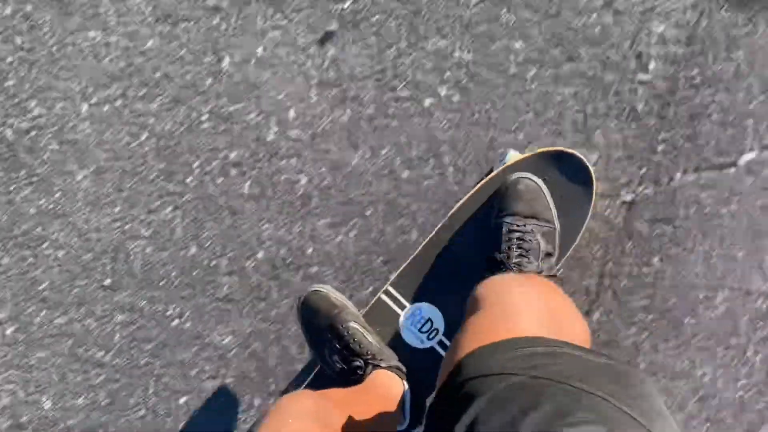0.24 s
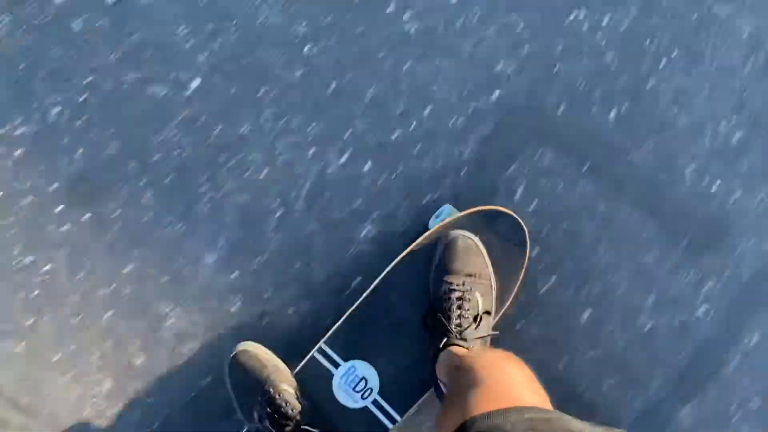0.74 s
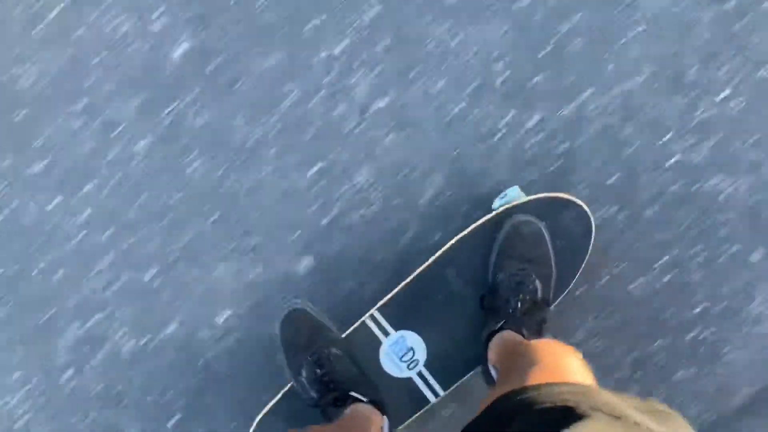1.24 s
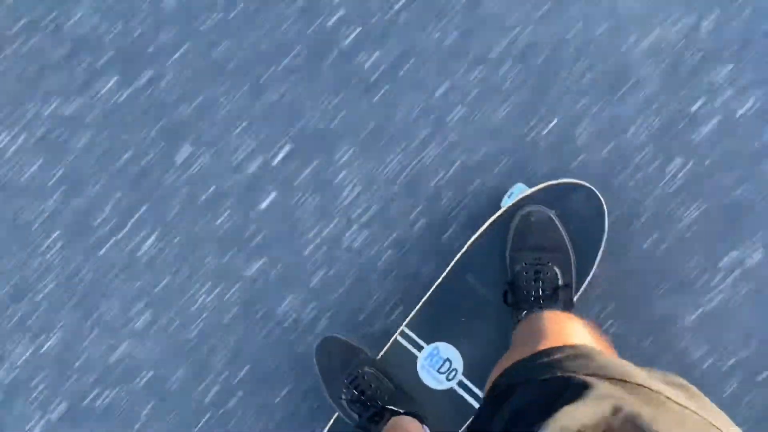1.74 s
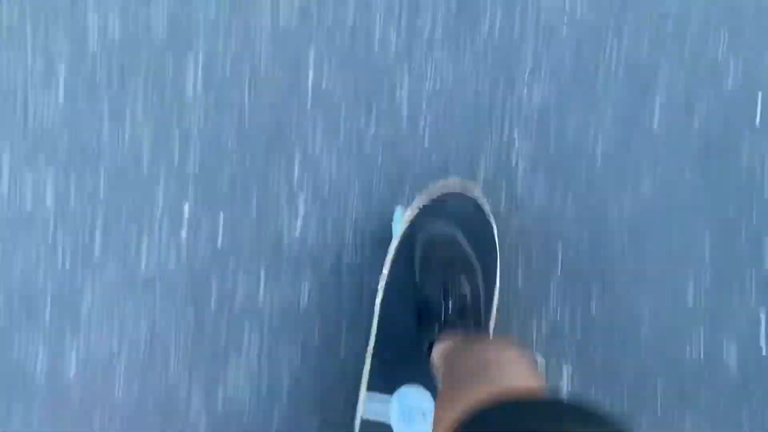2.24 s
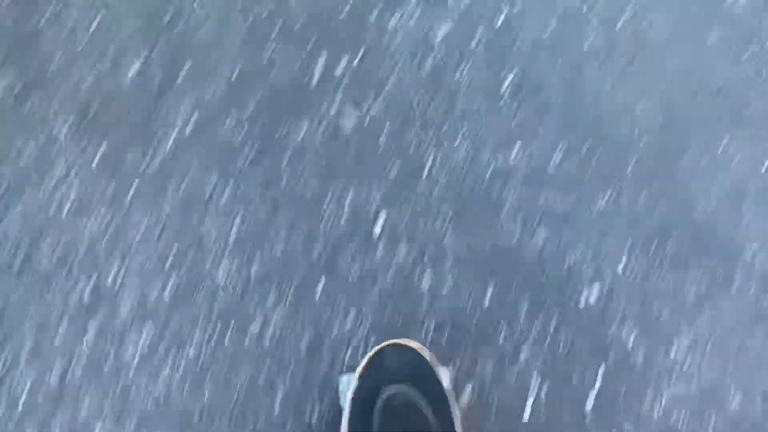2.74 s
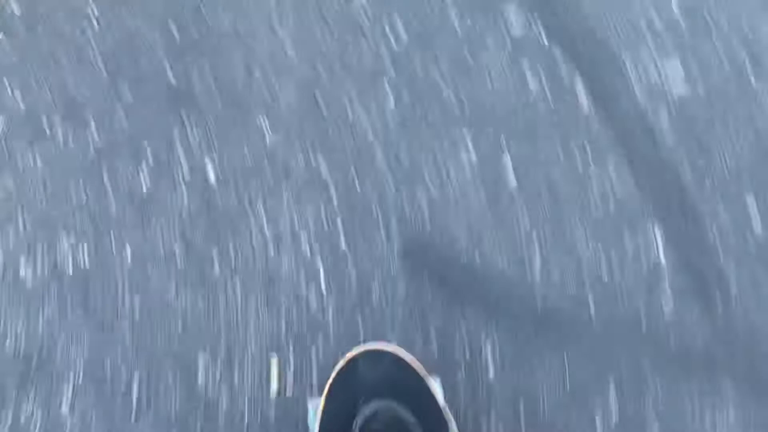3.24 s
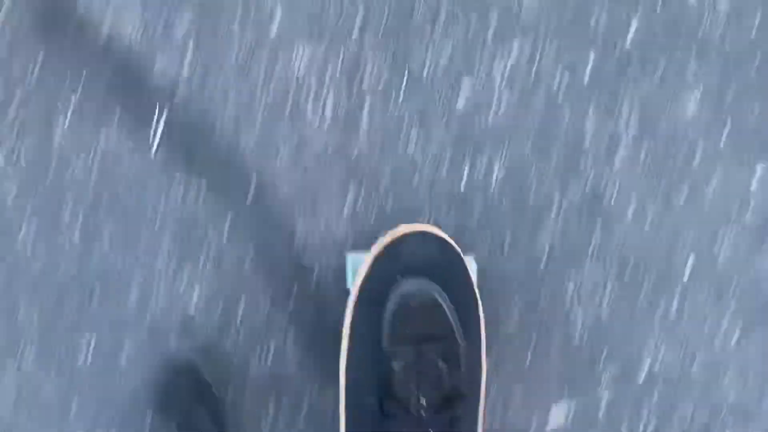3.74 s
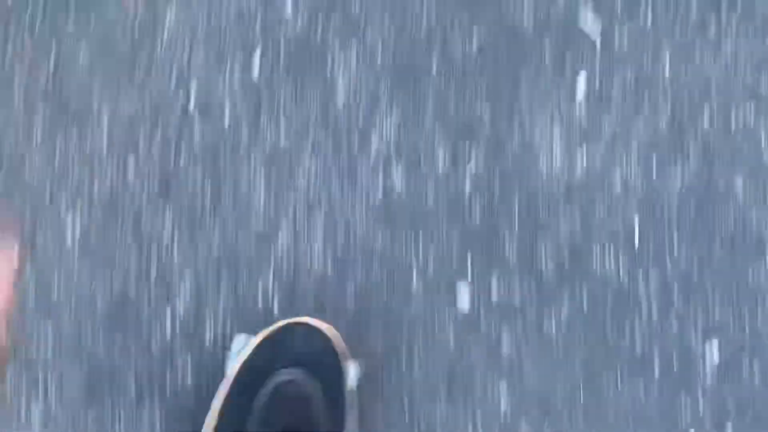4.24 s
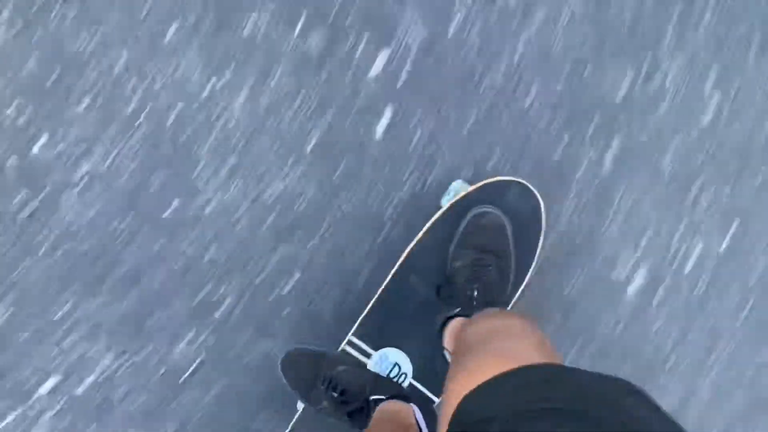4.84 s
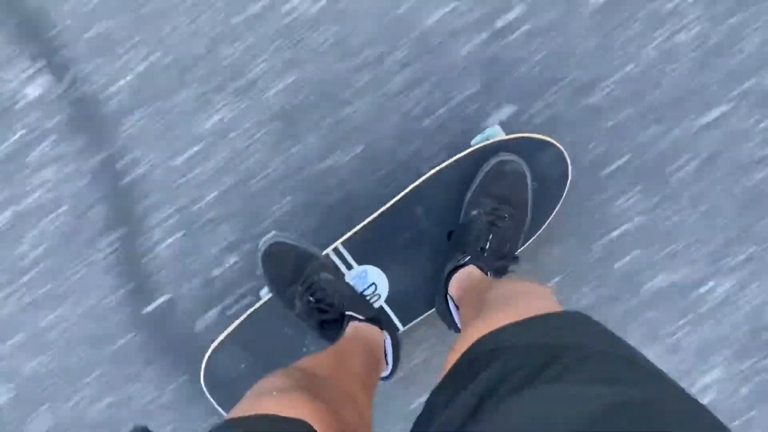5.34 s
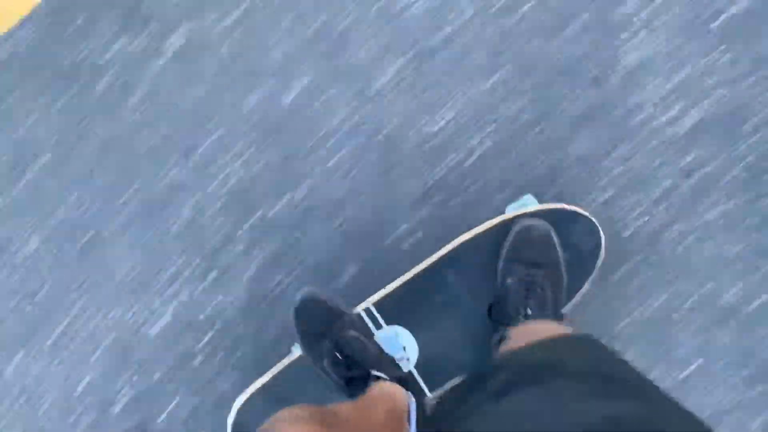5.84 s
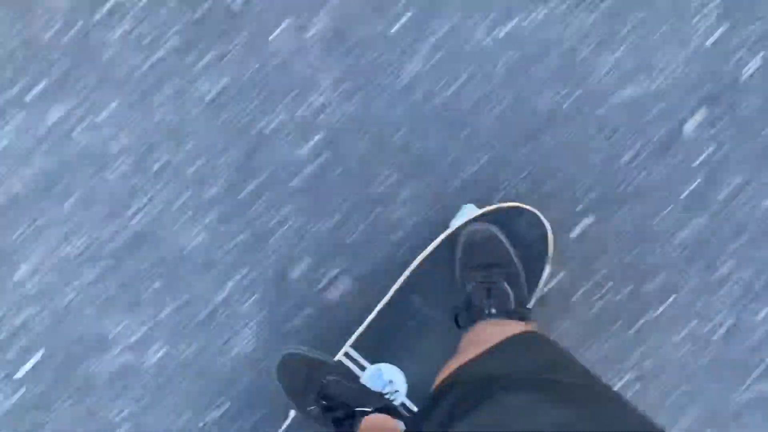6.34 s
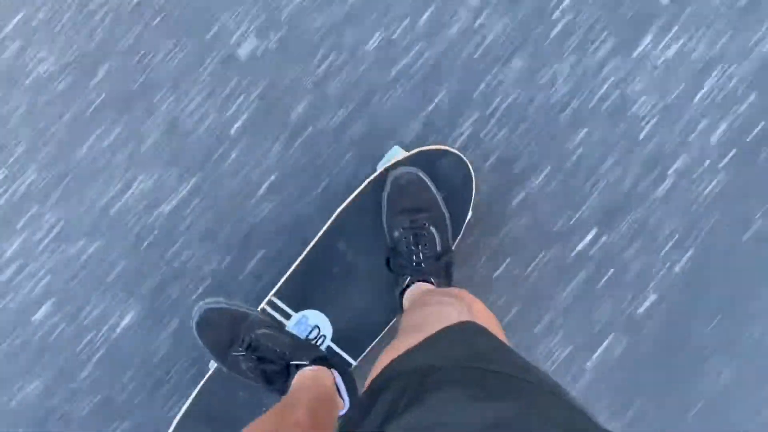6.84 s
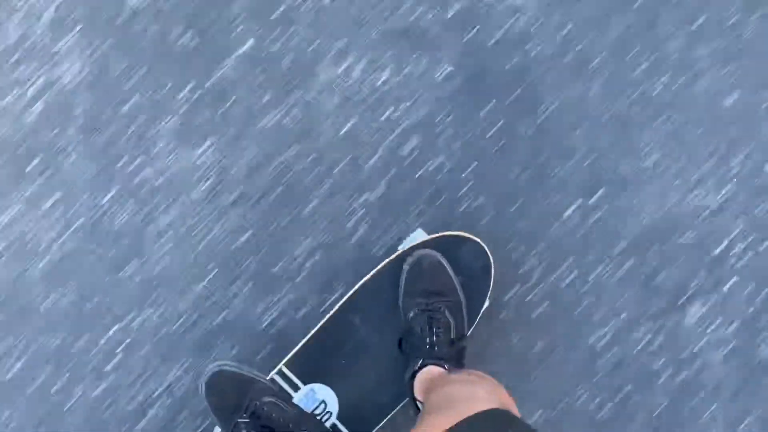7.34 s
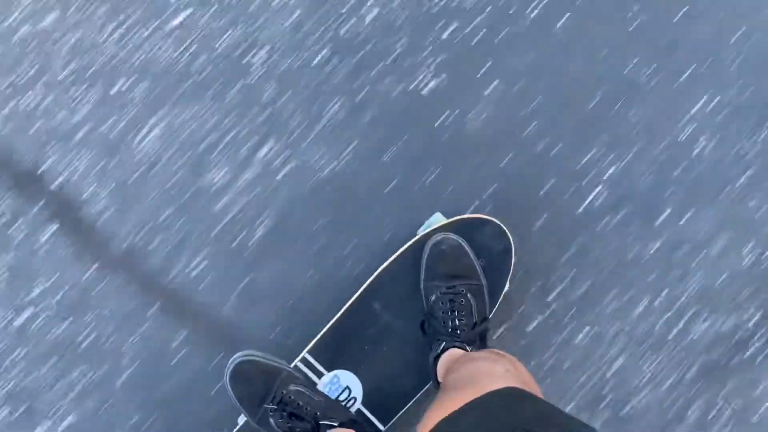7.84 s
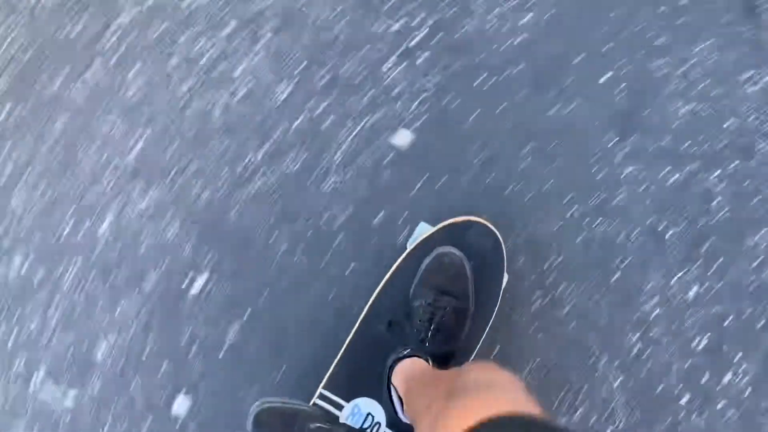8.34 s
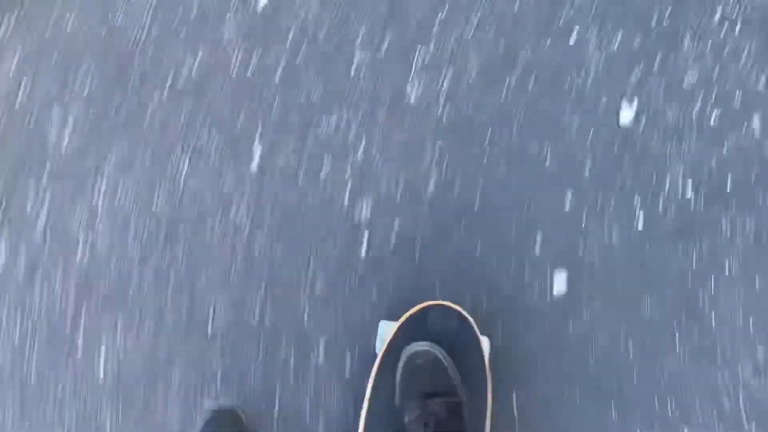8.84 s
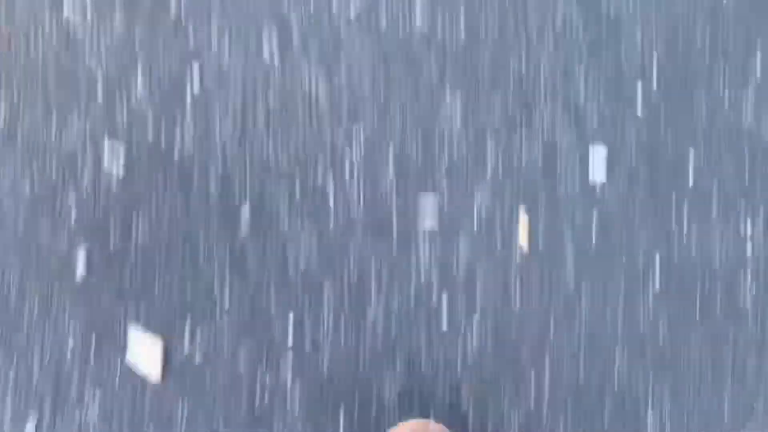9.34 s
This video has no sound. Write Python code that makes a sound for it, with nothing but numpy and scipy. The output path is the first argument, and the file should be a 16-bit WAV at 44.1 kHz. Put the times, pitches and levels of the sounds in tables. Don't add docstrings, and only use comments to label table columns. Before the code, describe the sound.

Close-up of soft skateboard wheels on coarse street pavement: grainy rattling roar, woody thumps over cracks, small metallic ticks, faint distant engine drone beneath.

```python
import sys
import numpy as np
from scipy import signal
from scipy.fft import rfft, irfft, next_fast_len
from scipy.io import wavfile
from scipy.ndimage import map_coordinates

SR = 44100
rng = np.random.default_rng(int(sys.argv[2]) if len(sys.argv) > 2 else 0)


def voltage_ratio(decibels):
    exponent = np.asarray(decibels, float) / 20
    return 10 ** exponent


def log_audio(samples):
    frames = np.atleast_2d(samples).T
    limited = np.clip(frames, -1, 1)
    pcm = np.round(limited * 32767).astype(np.int16)
    wavfile.write(sys.argv[1], SR, pcm)


N = 422478

# frequency in Hz, density in dB per Hz.
FIZZ = [(3500, -40), (5000, 4.5), (7000, -0.5), (10200, 1), (10900, -7.5), (15500, -7.5)]


def unit(x):
    return x / np.sqrt(np.mean(x ** 2) + 1e-20)


def along(points, hz):
    f, value = np.transpose(points)
    return np.interp(np.log(hz + 1), np.log(f + 1), value)


def curves(rows):
    seconds, *columns = np.transpose(rows)
    t = np.arange(N) / SR
    return [np.interp(t, seconds, column) for column in columns]


def wobble(rate):
    knots = rng.standard_normal(int(N * 100 / SR) + 4)
    return map_coordinates(knots, [np.arange(N) * min(rate, 99) / SR])


def filtered(x, response):
    size = next_fast_len(N + SR // 2)
    hz = np.fft.rfftfreq(size, 1 / SR)
    return irfft(rfft(x, size) * response(hz), size)[..., :N]


def coloured(x, spectrum):
    return unit(filtered(x, lambda hz: voltage_ratio(along(spectrum, hz))))


def modes(table):
    return lambda f: sum(voltage_ratio(db) * 1j * f * width / (centre * centre - f * f + 1j * f * width)
                         for centre, width, db in table)


def stones(count, spread_db, t60, smooth_db, clump_db):
    when, size = rng.random((2, count))
    strength = voltage_ratio(-spread_db * np.log(size + 1e-4))
    strikes = np.bincount((when * N).astype(int), strength, N)
    t = np.arange(1500) / SR
    flares = unit(signal.fftconvolve(strikes, voltage_ratio(-60 * t / t60))[:N])
    envelope = flares * voltage_ratio(clump_db * wobble(25)) + voltage_ratio(smooth_db)
    return envelope * rng.standard_normal(N)


def rolling():
    # time in seconds, deck ring in dB, deck body in dB over the ring, grit in dB, fizz in dB.
    roll = [(0.0, -34, 6.5, -42.5, -65.5), (0.1, -20.5, -8, -37, -57), (0.29, -21.5, -8.5, -30, -46),
            (0.61, -29, 4.5, -40, -57), (0.77, -28.5, -1, -45, -56), (0.98, -31, 6.5, -43.5, -53),
            (1.41, -28.5, 0, -42, -52.5), (1.62, -22.5, -8.5, -33, -46.5), (1.79, -25, -6, -35, -50.5),
            (1.97, -25, -2, -38, -55.5), (2.11, -26, -6.5, -44, -62.5), (2.24, -26.5, -12, -40, -58),
            (2.37, -31.5, -5, -47.5, -66), (2.48, -26.5, -9, -43, -60.5), (2.85, -35, -5, -48, -57.5),
            (2.91, -30.5, 0, -39, -52), (3.04, -23, -19, -32.5, -47), (3.09, -24.5, 2.5, -34.5, -50.5),
            (3.23, -32.5, -10, -42, -54), (3.28, -29.5, 1.5, -42.5, -51), (3.41, -33, -9.5, -43.5, -58.5),
            (3.49, -29.5, 3.5, -42, -51), (3.68, -24, 1.5, -38, -54), (3.84, -22, -7, -29.5, -48),
            (4.0, -28, 11.5, -38.5, -55), (4.24, -28.5, 4.5, -43.5, -55.5), (4.59, -19.5, 0.5, -31, -50),
            (4.67, -21.5, -6, -37, -49), (4.8, -21.5, -4.5, -37, -50), (5.07, -22, -2, -40.5, -53.5),
            (5.2, -22.5, 0, -41.5, -56.5), (5.58, -25.5, -0.5, -39.5, -51.5), (5.76, -24, 1.5, -44.5, -55),
            (6.0, -24, -3.5, -46, -57), (6.3, -28.5, 5.5, -42, -58), (6.69, -26.5, -5.5, -47.5, -61.5),
            (6.88, -27, 1.5, -42, -55.5), (6.99, -27, -7.5, -42.5, -58), (7.04, -20.5, -0.5, -35, -51),
            (7.07, -28.5, -1.5, -44, -57.5), (7.52, -28, -3, -42, -55), (7.63, -27.5, 3, -38.5, -52),
            (7.74, -28.5, -2.5, -41.5, -54), (7.82, -28.5, 3.5, -40, -54), (7.92, -30, -4, -41.5, -53),
            (8.06, -25.5, -3.5, -47.5, -56), (8.22, -28.5, -9.5, -46.5, -59), (8.48, -32, 1, -50, -58),
            (8.62, -41, 7, -52, -53), (8.81, -29, 2, -44, -51), (8.94, -25, -0.5, -39, -54),
            (9.28, -41, 9, -51, -56.5), (9.53, -35, 8.5, -42.5, -48.5), (9.58, -25, -4, -42, -51)]
    # centre in Hz, width in Hz, level in dB.
    deck = [(590, 93, 3), (499, 96, -6.5), (659, 35, -11)]
    trucks = [(1065, 134, 5.6), (2090, 86, 5.4), (2600, 610, 1.1), (6860, 320, 2.3)]
    # frequency in Hz, density in dB per Hz.
    body_spectrum = [(90, -25), (150, -2), (240, 2.5), (400, -1.5), (520, -11), (760, -13), (1000, -72)]
    grit_spectrum = [(600, -49), (850, 0), (1250, -2), (1900, -5.5), (2600, -6.5), (3300, -11.5),
                     (4200, -12.5), (5500, -39.5)]
    ring_db, body_db, grit_db, fizz_db = curves(roll)

    jolts = stones(count=2500, spread_db=1.5, t60=0.013, smooth_db=6.5, clump_db=3.0)
    deck_ring = filtered(jolts, lambda f: modes(deck)(f) / (1 + (f / 740) ** 12))
    ring = voltage_ratio(ring_db + 1.0) * unit(deck_ring)
    body = voltage_ratio(ring_db + body_db + 1.66 * wobble(20)) * coloured(jolts, body_spectrum)

    crackle = stones(count=1500, spread_db=3.0, t60=0.012, smooth_db=1.5, clump_db=5.5)
    crackle = filtered(crackle, lambda f: 1 + 0.76 * modes(trucks)(f))
    grit = voltage_ratio(grit_db + 4 + 1.63 * wobble(30)) * coloured(crackle, grit_spectrum)
    fizz = voltage_ratio(fizz_db + 5 + 1.7 * wobble(30)) * coloured(crackle, FIZZ)
    return ring + body + grit + fizz


def air():
    # time in seconds, level in dB.
    gusts = [(0.0, -33.5), (0.26, -29.5), (0.37, -38), (0.51, -30.5), (0.77, -38), (0.85, -28), (0.93, -35),
             (1.12, -33.5), (1.71, -31.5), (1.76, -28.5), (2.0, -35), (2.08, -30), (2.19, -33), (2.59, -30),
             (2.77, -35), (2.83, -27), (2.88, -31), (2.96, -21), (3.04, -34), (3.33, -32), (3.49, -17),
             (3.6, -25), (3.87, -31.5), (4.03, -23.5), (4.08, -36), (4.24, -19), (4.38, -21), (4.43, -32.5),
             (5.55, -31.5), (6.16, -20.5), (6.24, -28), (6.3, -21), (6.51, -34), (6.56, -32), (6.99, -33),
             (7.02, -31.5), (7.63, -30.5), (7.79, -33.5), (9.26, -35.5), (9.34, -26), (9.45, -27.5),
             (9.58, -32)]
    # frequency in Hz, density in dB per Hz.
    buffet = [(12, -47), (20, -34), (48, -2), (92, 4.5), (168, -3.5), (200, -4.5), (260, -31), (440, -120)]
    lumps = voltage_ratio(1.35 * wobble(12)) * rng.standard_normal(N)
    return voltage_ratio(curves(gusts)[0] - 1.0) * coloured(lumps, buffet)


def knocks():
    # start in seconds, peak in dB, deck pitch in Hz, 60 dB decay time in seconds.
    impacts = [(0.025, -10, 572, 0.054), (0.144, -12.5, 596, 0.05), (0.18, -9.5, 556, 0.05),
               (0.244, -5.5, 532, 0.055), (0.433, -8, 571, 0.06), (0.546, -26, 550, 0.05),
               (1.535, -10, 617, 0.05), (1.684, -12, 584, 0.05), (1.954, -10.5, 546, 0.05),
               (1.978, -10.5, 498, 0.056), (2.176, -9.5, 590, 0.05), (2.271, -13, 603, 0.056),
               (2.951, -13.5, 589, 0.046), (3.6, -2, 605, 0.057), (3.657, -15, 604, 0.05),
               (3.709, -21.5, 589, 0.05), (4.203, -8.5, 570, 0.035), (4.299, -14, 580, 0.05),
               (4.507, -2, 575, 0.053), (4.553, -5, 629, 0.044), (4.598, -3, 573, 0.056),
               (4.711, -1.5, 604, 0.046), (4.762, -6.5, 595, 0.05), (4.783, -19.5, 600, 0.056),
               (4.868, -7.5, 600, 0.05), (5.076, -6.5, 592, 0.057), (5.113, -12.5, 589, 0.05),
               (5.239, -16, 587, 0.046), (5.35, -8.5, 599, 0.05), (5.391, -5.5, 578, 0.056),
               (5.421, -10, 575, 0.042), (5.439, -6, 548, 0.05), (5.792, -6.5, 573, 0.053),
               (5.812, -11, 535, 0.047), (6.195, -8, 532, 0.045), (6.335, -8.5, 625, 0.042),
               (6.358, -5, 580, 0.043), (6.867, -2.5, 571, 0.044), (7.031, -4, 454, 0.039),
               (7.809, -9, 528, 0.05)]
    out = np.zeros(N + SR)
    t = np.arange(SR // 8) / SR
    for (start, peak_db, hz, t60), turn in zip(impacts, rng.random(len(impacts))):
        loading = (1 - np.exp(-t / 0.0022)) ** 2
        swell = loading * voltage_ratio(-60 * t / max(t60, 0.01))
        tone = np.sin(2 * np.pi * (hz * t + turn))
        out[round(start * SR):][:len(t)] += voltage_ratio(peak_db - 2.5) * swell / swell.max() * tone
    return out[:N]


def clicks():
    # start in seconds, peak in dB, centre in Hz, treble in dB over the peak.
    snaps = [(0.0618, -17.5, 2050, -30), (0.0927, -20, 1960, -20), (0.109, -15, 2000, -21),
             (0.1403, -19, 2010, -28), (0.159, -19, 1990, -19), (0.1935, -26, 1880, -18),
             (0.2239, -27, 1920, -19), (0.2394, -21, 1940, -13), (0.3057, -19, 1950, -15),
             (0.375, -37, 1500, -11), (0.375, -19.5, 1680, -21), (0.474, -19.5, 2600, -27),
             (0.541, -24, 2100, -19), (0.5896, -29, 2780, -29), (0.674, -23.5, 2360, -14),
             (1.008, -26, 2660, -11), (1.047, -27, 2170, -9), (1.065, -23.5, 2750, -14),
             (1.122, -28, 2740, -8), (1.4711, -41, 1670, -15), (1.5808, -24, 1500, -23),
             (1.6013, -27, 2800, -12), (1.625, -22, 1610, -16), (1.7268, -18, 2230, -23),
             (1.8083, -20, 2280, -21), (1.8791, -22, 2270, -21), (1.9195, -32, 1500, -17),
             (1.9204, -18, 2150, -13), (1.9786, -16.5, 2280, -21), (2.1415, -25.5, 2410, -26),
             (2.174, -20, 2130, -23), (2.273, -20.5, 2050, -27), (2.9183, -24, 1490, -23),
             (2.9187, -21, 1520, -16), (2.929, -17, 1770, -16), (2.9708, -21, 1710, -16),
             (2.9723, -16, 1700, -15), (3.0147, -17.5, 1730, -16), (3.0719, -18, 1750, -22),
             (3.189, -22, 1680, -17), (3.4321, -26.5, 1530, -13), (3.5828, -31, 2430, -10),
             (3.6296, -26, 1550, -12), (3.6745, -24, 1650, -13), (3.7455, -19, 1810, -14),
             (3.8142, -36, 2040, -19), (3.8636, -25, 2500, -21), (3.979, -14, 2030, -18),
             (4.026, -19, 2130, -19), (4.032, -19.5, 1690, -16), (4.299, -21, 1530, -16),
             (4.3799, -34, 1500, -8), (4.3799, -20, 1600, -12), (4.4493, -21, 1500, -17),
             (4.5436, -16, 2010, -15), (4.5441, -13, 2280, -23), (4.5521, -13.5, 2080, -20),
             (4.594, -18, 2430, -18), (4.6528, -14, 2460, -17), (4.6798, -15.5, 1540, -18),
             (4.8404, -30, 1630, -20), (5.2295, -26, 1530, -16), (5.5752, -33, 1620, -15),
             (6.1743, -31, 1580, -12), (6.1932, -17.5, 2660, -18), (6.344, -25, 1490, -21),
             (6.343, -14.5, 1860, -20), (6.763, -30, 2050, -10), (6.8523, -26, 2710, -26),
             (6.8659, -12, 2140, -19), (7.0199, -18, 1480, -16), (7.635, -22, 1660, -12),
             (8.0566, -29, 2050, -21), (8.1466, -26.5, 2090, -16), (8.8707, -26, 2040, -17)]
    ping, snap = np.zeros((2, N + SR))
    t = np.arange(600) / SR
    rise = 1 - np.exp(-t / 0.00038)
    noises = rng.standard_normal((len(snaps), 2, len(t)))
    for (start, peak_db, hz, treble_db), noise in zip(snaps, noises):
        first = round(start * SR)
        tone = np.sin(2 * np.pi * hz * t) + 0.49 * noise[0]
        ping[first:][:len(t)] += voltage_ratio(peak_db + 3.5 - 60 * t / 0.013) * rise * tone
        snap[first:][:len(t)] += voltage_ratio(peak_db + treble_db + 14.5 - 60 * t / 0.0084) * rise * noise[1]
    ping_band = [(700, -31), (1300, -0.5), (4200, 3), (6000, -21.5)]  # (Hz, dB)
    ping = filtered(ping[:N], lambda f: voltage_ratio(along(ping_band, f)))
    return ping + filtered(snap[:N], lambda f: voltage_ratio(along(FIZZ, f)))


def engine():
    # time in seconds, pitch in Hz, level in dB.
    stretches = [
        [(0.25, 79.7, -39.5), (1.058, 80.2, -37), (1.2, 78.7, -39)],
        [(4.85, 73, -41), (4.996, 73.7, -37.5), (5.5, 74, -35)],
        [(5.8, 87.2, -31), (5.96, 75.9, -26.5), (6.2, 79.2, -32)],
        [(6.55, 65.2, -32), (7.21, 65.3, -34.5), (7.37, 63.9, -36), (7.86, 63.8, -31.5), (9.12, 63.9, -32.5)],
        [(9.14, 66.6, -41), (9.484, 91.9, -26), (9.58, 92.2, -42)],
    ]
    second_drone = [
        [(6.8, 104.3, -41), (7.0, 104.6, -40), (7.57, 102.6, -39.5), (9.07, 102.5, -45), (9.1, 102.8, -43)],
    ]
    out = np.zeros(N)
    t = np.arange(N) / SR
    for rows in stretches + second_drone:
        hz, db = curves(rows)
        inside = np.minimum(t - rows[0][0], rows[-1][0] - t)
        fade = np.clip(inside / 0.06 + 0.5, 0, 1)
        tone = np.sin(2 * np.pi * np.cumsum(hz) / SR)
        out += fade * voltage_ratio(db + 3 + 0.8 * wobble(5.4)) * tone
    return out


def ports(x):
    # frequency in Hz, phase lead of the left port in radians (a plain delay in the treble).
    lead = [(0, 0), (200, -.2), (650, -.8), (850, -.4), (1150, -1.1), (1400, .3), (2350, 1.85), (3100, 1.1),
            (4750, 3.14), (15300, 18.85), (22050, 29)]
    # frequency in Hz, left minus right in dB.
    tilt = [(60, -2.3), (180, -3.3), (600, 0.7), (1000, -2.5), (1400, 1), (2000, -1.5), (3000, -0.5)]
    # frequency in Hz, share of sound that differs between ports in dB.
    apart = [(60, -15), (150, -6), (600, -29.5), (1200, -11), (2000, -10.5), (8000, -21), (15000, -14)]

    def half(hz):
        return voltage_ratio(along(tilt, hz) / 2) * np.exp(0.5j * np.interp(hz, *np.transpose(lead)))

    direct = filtered(x, lambda hz: np.array([half(hz), 1 / half(hz)]))
    t = np.arange(900) / SR
    scatter = rng.standard_normal(len(t)) * voltage_ratio(-60 * t / 0.022)
    other = signal.fftconvolve(x, scatter / np.linalg.norm(scatter))[:N]
    other = filtered(other, lambda hz: voltage_ratio(along(apart, hz)) * np.array([half(hz), -1 / half(hz)]))
    return direct + other


def scene():
    return ports(rolling() + air() + knocks() + clicks() + engine())


def top_cut(x):
    return signal.sosfilt(signal.butter(12, 16970, fs=SR, output="sos"), x)


def record(dry):
    x = filtered(dry, lambda hz: hz < 15750)
    x = x / (1 + np.abs(x / 0.85) ** 8) ** (1 / 8)
    return top_cut(x)


dry = scene()
out = record(dry)
log_audio(out)
```